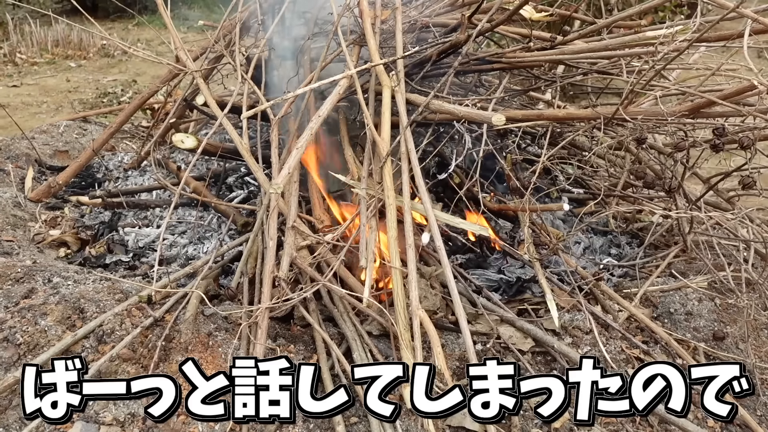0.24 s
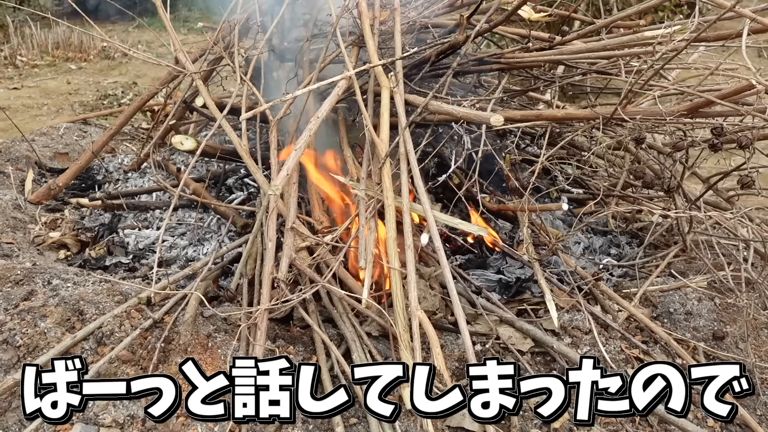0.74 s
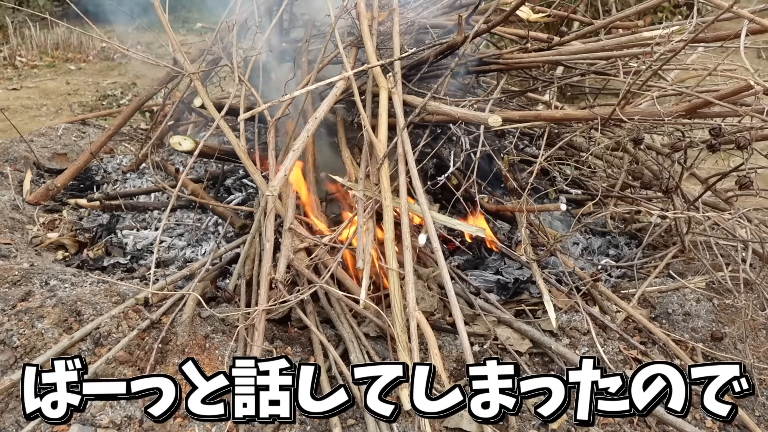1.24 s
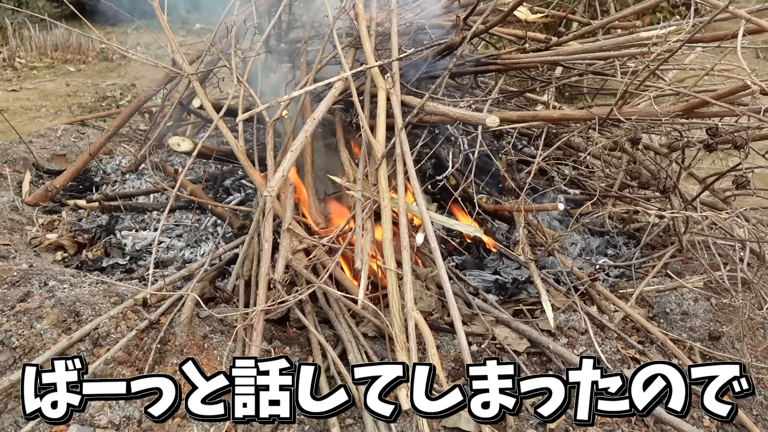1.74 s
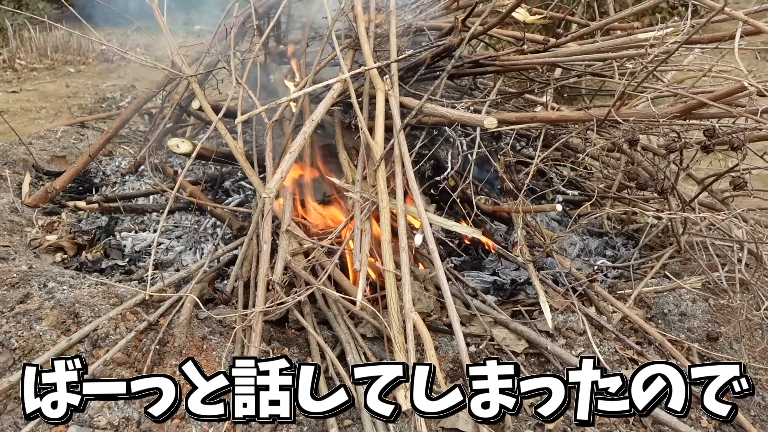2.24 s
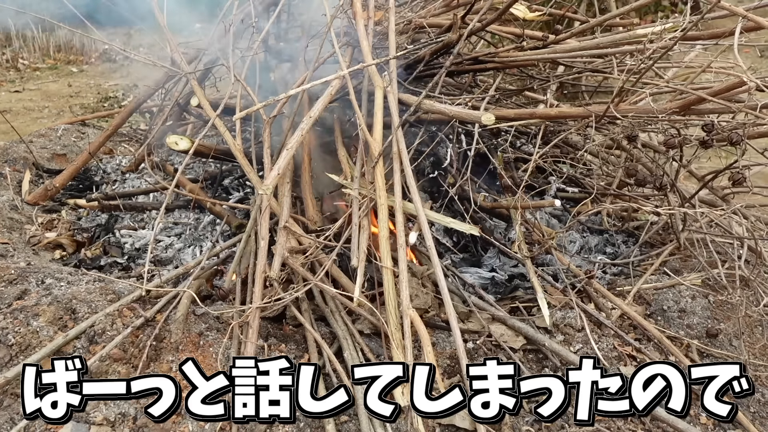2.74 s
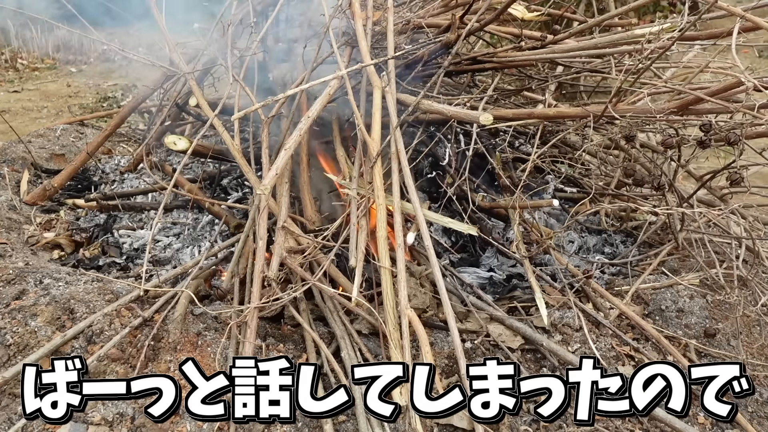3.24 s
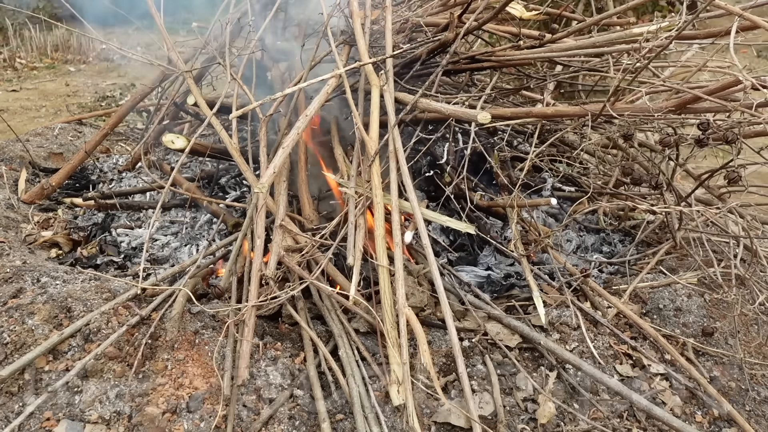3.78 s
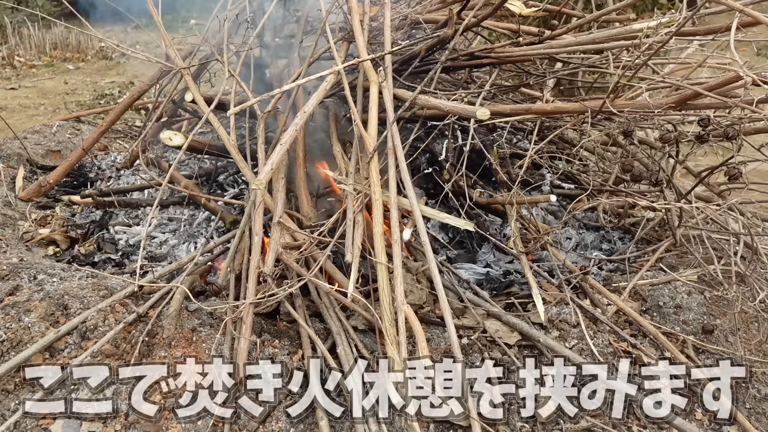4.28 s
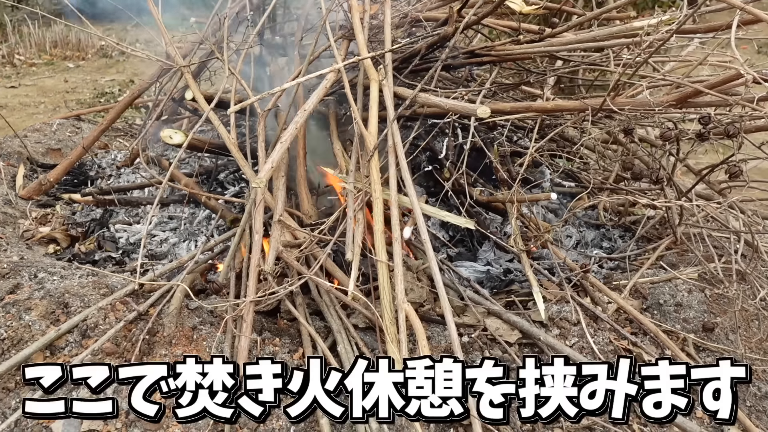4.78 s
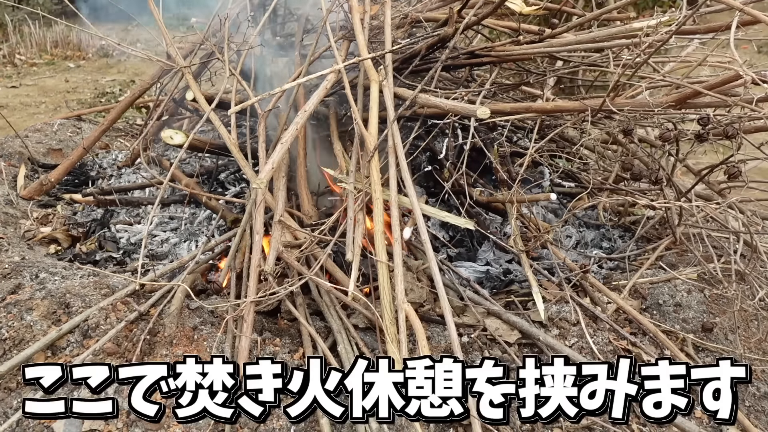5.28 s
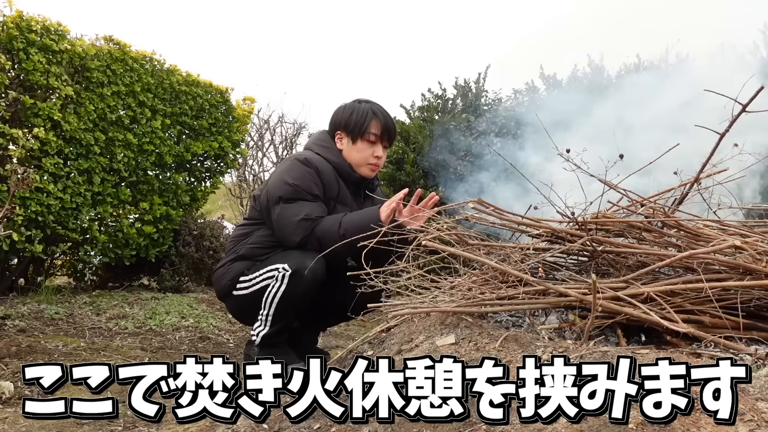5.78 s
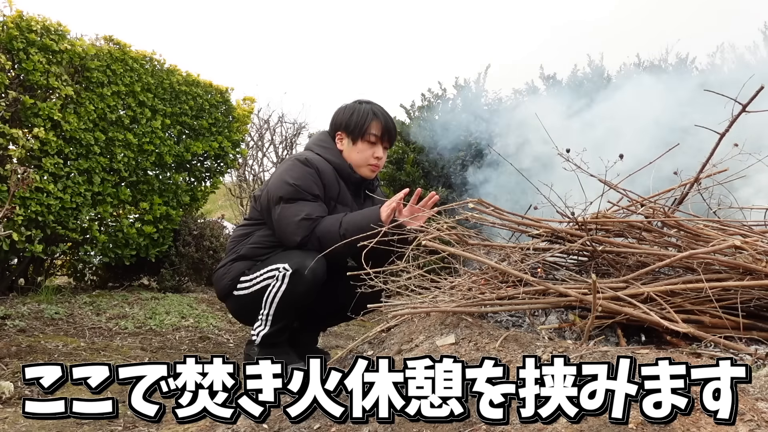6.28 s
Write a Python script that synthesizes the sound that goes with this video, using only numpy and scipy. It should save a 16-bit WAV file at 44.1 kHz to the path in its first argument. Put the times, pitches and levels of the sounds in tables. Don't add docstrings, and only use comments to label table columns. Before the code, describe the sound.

A close bonfire of dry branches flutters, hisses and snaps with sharp pops, then cuts abruptly to a quieter, more distant fire.

```python
import sys
import numpy as np
from scipy import signal
from scipy.fft import rfft, irfft, next_fast_len
from scipy.io import wavfile
from scipy.ndimage import uniform_filter1d

SR = 44100
rng = np.random.default_rng(int(sys.argv[2]) if len(sys.argv) > 2 else 0)


def to_wav(sig):
    pcm = np.clip(np.atleast_2d(sig), -1, 1) * 32767
    pcm = np.round(pcm).astype(np.int16)
    wavfile.write(sys.argv[1], SR, pcm.T)


def field_ratio(decibels):
    return 10 ** (np.asarray(decibels, dtype=float) / 20)


N = 287399
SIZE = next_fast_len(N + SR // 2)
CUT_S = 5.736


def curve(table):
    s, *columns = np.transpose(table)
    return [np.interp(np.arange(N) / SR, s, c) for c in columns]


def gain(points, size=SIZE):
    hz, db = np.transpose(points)
    bins = np.fft.rfftfreq(size, 1 / SR)
    return field_ratio(np.interp(np.log(bins + 1), np.log(hz), db))


def colour(x, points):
    cepstrum = irfft(np.log(gain(points, size=2048)))
    cepstrum[1:1024] *= 2
    cepstrum[1025:] = 0
    response = irfft(np.exp(rfft(cepstrum)))[:1024]
    return signal.fftconvolve(x, response)[:N]


def walk(rate):
    hold = int(SR / rate)
    steps = np.repeat(rng.standard_normal(N // hold + 1), hold)
    return 1.36 * uniform_filter1d(uniform_filter1d(steps, hold), hold)[:N]


# frequency in Hz, unshared part in dB.
APART = [(60, -27), (125, -20), (200, -14), (300, -9.5), (450, -2.5), (800, 0.5), (1500, -1.5), (2500, -8),
         (5000, -50), (9000, -28), (15000, -13)]


def rush(points, flicker_db, rate, shared_db):
    mid, side = rfft(rng.standard_normal((2, SIZE))) * gain(points)
    pair = mid + np.outer([1, -1], side * gain(APART))
    half_octave = 2 * np.log2(np.fft.rfftfreq(SIZE, 1 / SR) + 1)
    lowest = np.floor(2 * np.log2(points[0][0]))
    highest = 2 * np.log2(points[-1][0])
    out = 0
    for k in np.arange(lowest, highest + 1):
        band = np.cos(np.pi / 2 * np.clip(half_octave - k, -1, 1)) ** 2
        out = out + irfft(pair * band, SIZE)[:, :N] * field_ratio(flicker_db * walk(rate))
    out = out * field_ratio(shared_db * walk(3 * rate))
    return out / np.sqrt(np.mean(out ** 2))


# frequency in Hz, level in dB per Hz.
ROAR = [(20, -43), (40, -21), (60, -4.5), (90, 2.5), (120, 0), (150, -21.5)]
FLUTTER = [(90, -21.5), (125, -3.5), (180, 2.5), (235, -5.5), (290, -25)]
UPPER = [(190, -17.5), (250, 1.5), (350, -3.5), (430, -11.5), (600, -32), (900, -31)]
# time in seconds, flutter level in dB.
DRAUGHT = [(0.0, -54.5), (0.05, -46.5), (0.6, -52), (0.74, -48), (0.85, -55.5), (0.93, -48), (0.96, -60),
           (1.03, -52.5), (1.16, -58), (1.7, -62), (2.01, -53.5), (3.21, -63), (5.9, -63.5), (5.95, -59),
           (6.19, -63), (6.52, -59.5)]
# peak in seconds, half length in seconds, lift in dB.
TONGUES = [
    (.25, .2, 9),
    (1.03, .17, 10),
    (1.5, .3, 5),
    (2.1, .2, 5),
    (3.05, .1, 4),
    (3.55, 0.22, 7),
    (3.95, .15, 6),
    (5.6, .15, 4),
    (6.5, .1, 9),
]
# peak in seconds, lift in dB.
GUSTS = [(.06, 6), (.6, 5), (.8, 4), (1.3, 4), (1.64, 4), (1.8, 5), (2.1, 8), (2.24, 4), (2.69, 7),
         (2.9, 5), (3.2, 8), (3.95, 3), (4.64, 4), (4.88, 5), (5.27, 3), (5.54, 12), (6.2, 5)]


def flames(near):
    t = np.arange(N) / SR
    draught, = curve(DRAUGHT)
    swing = draught - draught.mean()
    gust = sum(db * np.exp(-((t - s) / 0.06) ** 2) for s, db in GUSTS)
    lick = sum(db * np.exp(-((t - s) / half) ** 2) for s, half, db in TONGUES)
    roar_db = -64 + 0.2 * swing + gust + 1.5 * walk(12)
    flutter_db = draught + 1.47 * walk(11)
    upper_db = -70 + 0.55 * swing + lick - 14 * (1 - near)
    bands = [(roar_db, ROAR), (flutter_db, FLUTTER), (upper_db, UPPER)]
    return sum(field_ratio(db) * rush(points, flicker_db=1.08, rate=6.7, shared_db=0.45) for db, points in bands)


# frequency in Hz, gain in dB.
EDGE = [(14900, 0), (15250, -2), (15400, -7), (15800, -10), (15900, -70)]


def with_vents(points, vents):
    hz = np.geomspace(points[0][0], 16000, 800)
    point_hz, point_db = np.transpose(points)
    db = np.interp(np.log(hz), np.log(point_hz), point_db)
    db = db + np.interp(hz, *np.transpose(EDGE))
    lift = sum(field_ratio(d - 1) ** 2 / (1 + (2 * (hz - f) / max(width, 150)) ** 2) for f, width, d in vents)
    return np.transpose([hz, db + 10 * np.log10(1 + lift)])


# frequency in Hz, level in dB per Hz.
JET_A = [(260, -26), (450, -9), (506, -8.5), (743, -12), (1490, -17), (2030, -14.5), (2640, 1.5),
         (3110, -4.5), (3600, 5), (4770, 1), (5530, 1.5), (6310, 0), (8110, 1), (11200, -2.5),
         (15300, -16.5)]
JET_B = [(260, -56), (450, -32), (623, -17.5), (680, -24.5), (1510, -18), (1880, -23), (2210, -6.5),
         (2890, -6), (3400, 1.5), (4120, -7), (6700, -4.5), (8730, -9), (9130, -12.5), (11700, -12),
         (15300, -32)]
SPIT = [(1200, -41), (2500, -8), (4000, 2.5), (7500, 6), (12000, -3.5), (15000, -9), (16000, -25)]
FAR = [(300, -14), (450, 1.5), (900, 0), (1600, -1), (2500, -4.5), (3500, -3.5), (6500, -3), (10000, -10),
       (14000, -12), (15700, -16), (16000, -42)]
# centre in Hz, width in Hz, level in dB.
VENTS_A = [(2460, 170, 0), (3500, 1200, -9.5), (5450, 170, 4.5), (6440, 110, -15), (7630, 83, -16),
           (9900, 68, -15)]
VENTS_B = [(3570, 510, -6.5), (4700, 200, 5), (6770, 170, 3.5), (7740, 380, 2), (8640, 120, 6.5),
           (10900, 540, 2), (11700, 300, 0)]
# peak in seconds, peak in dB, seconds to rise by 60 dB, seconds to fall by 60 dB.
SPITS = [
    (2.03, -53, .08, .06),
    (2.29, -49, .3, .1),
    (2.503, -38, .05, .27),
    (6.116, -59, .01, .15),
    (6.15, -72, .1, 1.2),
    (6.505, -59, .03, .07),
]


def steam(near):
    t = np.arange(N) / SR
    opening = np.clip((t - 2.3) / 0.27 + 0.5, 0, 1)
    share = np.clip(0.27 + (0.74 - 0.27) * opening + 0.07 * walk(2.5), 0, 1)
    first = rush(with_vents(JET_A, VENTS_A), flicker_db=0.5, rate=14, shared_db=0.5)
    second = rush(with_vents(JET_B, VENTS_B), flicker_db=0.5, rate=14, shared_db=0.5)
    jets = np.sqrt(1 - share) * first + np.sqrt(share) * second
    low = rush([(500, -19.0), (1200, -11.5), (1800, -4.0), (2400, -16)], flicker_db=1.5, rate=12, shared_db=1.5)
    low = field_ratio(-22 + 1.5 * walk(2.51) + 6 * share) * low
    close = field_ratio(-51.5 - 0.12 * t) * (jets + low)
    spit_level = sum(field_ratio(db - 60 * np.where(t < s, (s - t) / rise, (t - s) / fall))
                     for s, db, rise, fall in SPITS)
    spits = spit_level * rush(with_vents(SPIT, [(3500, 900, 0)]), flicker_db=1.0, rate=200, shared_db=3.0)
    far = field_ratio(-71) * rush(FAR, flicker_db=0.5, rate=8, shared_db=0.4)
    return near * close + spits + (1 - near) * far


# time in seconds, pitch in Hz, level in dB.
WHISTLE = [
    (3.405, 4980, -69),
    (3.42, 5040, -58),
    (3.465, 5250, -56),
    (3.485, 5340, -66),
]


def whistle():
    hz, db = curve(WHISTLE)
    t = np.arange(N) / SR
    on = (t > WHISTLE[0][0]) * (t < WHISTLE[-1][0])
    phase = 2 * np.pi * np.cumsum(hz + 10 * walk(100)) / SR
    return on * field_ratio(db + walk(100)) * np.sin(phase)


# start in seconds, peak in dB, pitch in Hz.
THUDS = [
    (1.0815, -36, 260),
    (5.407, -53, 400),
    (.204, -40, 350),
    (1.612, -47, 400),
    (2.483, -46, 380),
]


def thuds():
    out, t = np.zeros(N), np.arange(1024) / SR
    for s, db, hz in THUDS:
        fade = field_ratio(db + 3 - 60 * t / 0.021) * (1 - np.exp(-t / 0.0015))
        at = int(s * SR)
        out[at:at + 1024] += fade * np.sin(2 * np.pi * hz * t)
    return out


def shock(hz, edge_db, thump_db, top_db=-4.5):
    points = [(120, thump_db - 18), (800, thump_db), (hz, 0),
              (1.26 * max(hz, 8000), edge_db), (17000, edge_db + top_db)]
    delay = np.exp(-2j * np.pi * np.arange(257) * 64 / 512)
    turn = np.exp(1j * 2.0)
    return irfft(gain(points, size=512) * delay * turn)[:128] * np.hanning(128)


def crackle():
    where, size = rng.random((2500, 2)).T
    clicks = np.zeros(N)
    clicks[(where * N).astype(int)] = field_ratio(np.minimum(-3.5 * np.log(size + 1e-9), 14))
    return field_ratio(-60) * np.convolve(clicks, shock(2700, 8.6, -4.5) * 4)[:N]


# time in seconds, peak in dB, main pitch in Hz, sharp edge in dB, low
# thump in dB.
CRACKS = [
    (1.0798, -18, 3500, 1.5, -8),
    (2.481, -2.5, 4680, -2.5, -23),
    (3.3938, -9.5, 4600, -5.5, -14.5),
    (3.5133, -6, 5860, -4, -14),
    (3.6343, -6.5, 6300, -6, -15),
    (4.0474, -9, 8660, -7.5, -27),
]
BARE = [
    (0.1542, -13, 4700, -14.5, -13),
    (1.6095, -14, 3570, -7, -12),
    (2.7736, -8, 3960, -12.5, -17),
    (5.2387, -18.5, 3720, -10, -16.5),
]
DENSE = [
    (0.2016, -5, 4570, -10, -14),
    (1.3892, -13, 8850, -8.5, -8),
    (2.8209, -17, 6800, -1, -12),
    (4.3762, -20, 3500, -5.5, -17),
    (6.4833, -23, 3400, -3, -13),
]
DISTANT = [
    (6.004, -52, 4110, -10, -18.5),
    (6.046, -52, 3300, -10, -18),
    (6.066, -49, 5220, -13, -22),
    (6.1106, -23.5, 4800, 0, -9),
    (6.128, -36.5, 6310, -5, -12),
    (6.1985, -35, 3220, -4, -9),
    (6.22, -36, 5370, -3, -4),
    (6.289, -42.5, 3050, -14, -2),
]
# time in seconds, peak in dB, main pitch in Hz.
TICKS = [(0.221, -23, 7040), (0.481, -31, 5700), (0.551, -28, 5230), (0.989, -31.5, 7650),
         (1.291, -32, 6620), (1.617, -29, 7000), (1.786, -28, 5200), (1.796, -26, 6710), (2.012, -26, 7540),
         (2.025, -25.5, 5370), (2.153, -34, 4560), (2.501, -22, 6820), (2.686, -40, 7460),
         (3.187, -34, 6920), (3.981, -31, 5340), (5.289, -31, 5370)]
# time in seconds, peak in dB, low thump in dB.
DULL = [(0.021, -31, -10), (0.209, -32, -5), (0.885, -36, 1), (1.002, -28.5, -13), (1.039, -43, -4),
        (1.728, -31, -5), (2.365, -30, -13), (2.387, -31, -18), (2.528, -27.5, -16), (2.543, -32, -13),
        (2.739, -37, -12), (2.802, -40, 0), (2.859, -39, -10), (3.034, -36, -5), (3.049, -43, -6),
        (3.327, -29, -15), (3.549, -36, -5), (3.63, -35, -13), (3.797, -30.5, -11), (3.913, -31.5, -20),
        (4.089, -28.5, -22), (4.249, -27.5, -15), (4.479, -35.5, -6), (4.594, -29, -14), (5.405, -37, -8),
        (5.706, -38, -23)]
TWIGS_DB = {"cracks": -14, "splits": -11, "bare": -21, "distant": -18, "ticks": -17, "dull": -18.5}


def all_bursts():
    loud = [("cracks", CRACKS), ("bare", BARE), ("splits", DENSE), ("distant", DISTANT)]
    bursts = [(*row, TWIGS_DB[kind]) for kind, table in loud for row in table]
    bursts += [(*row, -4.5, -23, TWIGS_DB["ticks"]) for row in TICKS]
    bursts += [(s, db, 3500, -13, thump_db, TWIGS_DB["dull"]) for s, db, thump_db in DULL]
    return bursts


def twig_echoes(twig_db):
    t = np.arange(1024) / SR
    mid, side = rng.standard_normal((2, 1024))
    chance = mid + 0.55 * np.outer([1, -1], side)
    fade = field_ratio(-60 * t / 0.006) + field_ratio(-27 - 60 * t / 0.04)
    fade = fade * np.clip(t / 0.00025 - 0.3, 0, 1)
    twigs = field_ratio(twig_db - 3) * chance * np.abs(mid) ** 0.5 * fade
    twigs[:, 1:] -= 0.63 * twigs[:, :-1].copy()
    twigs[:, 0] = 1
    return twigs


def pops():
    out = np.zeros((2, N + 2048))
    for s, db, hz, edge_db, thump_db, twig_db in all_bursts():
        small = db < -21 and s < CUT_S
        burst = shock(hz, edge_db, thump_db, -14 if small else -3)
        burst = field_ratio(db + 2) * burst / np.abs(burst).max()
        wave = signal.fftconvolve(burst[None], twig_echoes(twig_db), axes=1)
        at = int((s + 0.0017) * SR) - 64
        out[:, at:at + wave.shape[1]] += wave
    return out[:, :N]


def hedge(x):
    t = np.arange(SR // 5) / SR - 0.02
    shape = np.where(t < 0, np.exp(-(t / 0.0015) ** 2), field_ratio(-60 * np.abs(t) / 0.055))
    pan_db = np.array([[0.5], [-0.5]]) * 2
    leaves = rng.standard_normal((2, len(t))) * shape * field_ratio(-26 - 20 + pan_db)
    return signal.fftconvolve(x[None], leaves, axes=1)[:, :N]


# frequency in Hz, gain in dB.
PORT = [(200, -2.5), (1000, -3.5), (2200, -4), (3400, 0.5), (5000, -1.5), (8500, -2.5), (12000, -4),
        (16000, -16)]


def scene():
    near = np.clip((CUT_S - np.arange(N) / SR) / 0.0015, 0, 1)
    snaps = pops() + colour(crackle(), EDGE) * near
    bursts = np.array([colour(x, PORT) for x in snaps])
    return flames(near) + steam(near) + whistle() + thuds() + bursts + hedge(bursts.mean(axis=0))


def top_cut(x):
    return signal.sosfilt(signal.butter(12, 17050, fs=SR, output="sos"), x)


# frequency in Hz, difference in dB.
LEFT_MINUS_RIGHT = [(60, 0.5), (110, -0.5), (200, 0.5), (380, 0), (700, -1.0), (1290, -3), (2380, -1.5),
                    (4400, -3.5), (8120, -3), (15000, 3)]
# frequency in Hz, gain in dB.
TOP = [(16000, 0), (16600, -16.5), (16800, -88)]


def record(dry):
    tilt = np.sqrt(gain(LEFT_MINUS_RIGHT))
    response = gain(TOP) * np.array([tilt, 1 / tilt])
    mix = irfft(rfft(dry, SIZE) * response, SIZE)[:, :N]
    return top_cut(mix)


dry = scene()
out = record(dry)
to_wav(out)
```